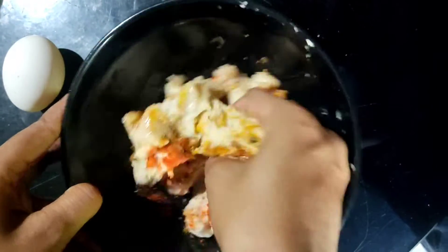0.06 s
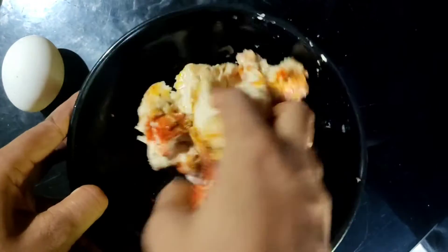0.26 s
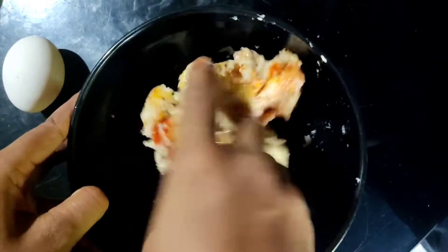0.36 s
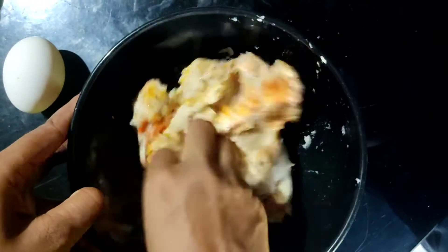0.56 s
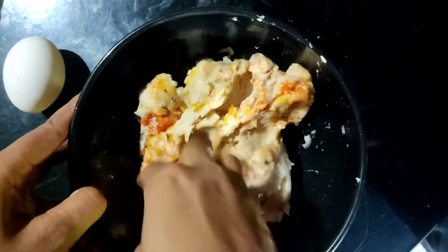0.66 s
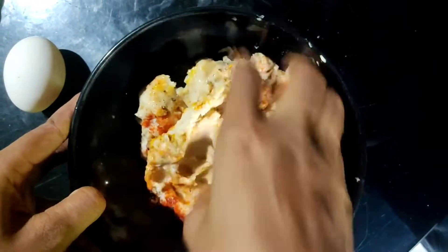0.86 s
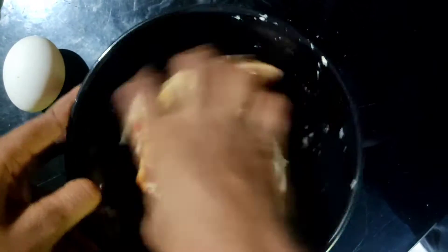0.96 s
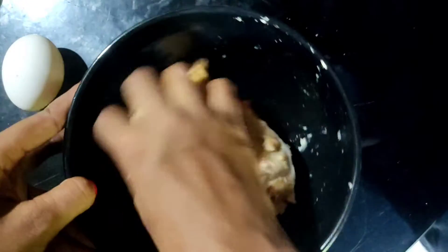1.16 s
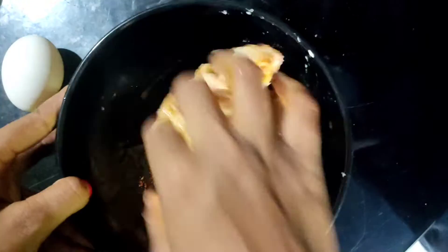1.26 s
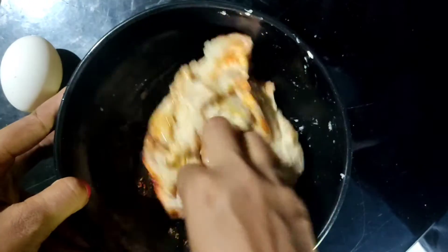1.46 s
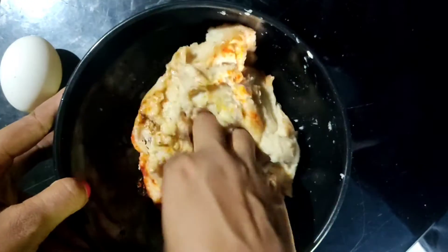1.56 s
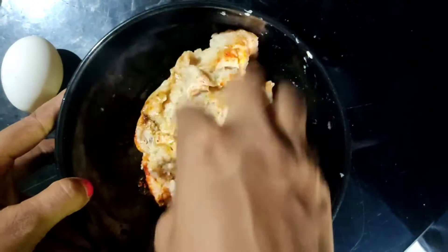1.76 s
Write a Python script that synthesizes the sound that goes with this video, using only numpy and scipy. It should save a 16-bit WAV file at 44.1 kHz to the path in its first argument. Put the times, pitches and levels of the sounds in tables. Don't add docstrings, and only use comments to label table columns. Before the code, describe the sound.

Sticky wet paste crackles under a kneading hand, heard very close in a small kitchen. Fine snaps and a slight finger squeak open it; at 0.23 and 0.3 seconds the bowl knocks hard on the counter, hollow and briefly ringing. Softer crackles follow around 0.6 to 0.8, then near quiet. A light bowl touch at 1.05 leads into smearing, densest snapping near 1.3, and gentler crackles from 1.5 over faint low hum.

```python
import sys
import numpy as np
from scipy import signal
from scipy.fft import rfft, irfft, next_fast_len
from scipy.io import wavfile

SR = 44100
rng = np.random.default_rng(int(sys.argv[2]) if len(sys.argv) > 2 else 0)


def pcm_store(signal):
    levels = np.round(np.clip(np.atleast_2d(signal), -1, 1) * 32767)
    wavfile.write(sys.argv[1], SR, levels.astype(np.int16).T)


def gain_from_decibels(decibels):
    exponent = np.asarray(decibels, float) / 20
    return 10 ** exponent


N = 79380
T = np.arange(N) / SR
LEFT_LAG_S = .00048


def paste(sticky_db):
    out = crackle(sticky_db)
    add_snaps(out)
    return out


def crackle(sticky_db):
    snaps_per_s, spread_db, clump_db = 1400, 4, 3.5
    grain_hz, grain_s, click_share = 7900, .0006, .35
    crackle_db, hiss_db = -2, -5.5
    sizes = gain_from_decibels(spread_db * np.minimum(rng.exponential(1, N), 4)) * rng.choice([-1, 1], N)
    clicks = sizes * (rng.random(N) < snaps_per_s * gain_from_decibels(clump_db * drift(40)) / SR)
    t = T[:int(grain_s * SR)]
    grain = np.hanning(len(t)) * np.cos(2 * np.pi * grain_hz * t) / 4
    fine = click_share * clicks + np.convolve(clicks, grain, "same")
    fine = ports(fine, fine)
    hiss = ports(*rng.standard_normal((2, N)))
    mix = gain_from_decibels(crackle_db) * fine / fine[1].std() + gain_from_decibels(hiss_db) * hiss / hiss[1].std()
    return gain_from_decibels(sticky_db + 4.0) * mix


# middle_s, level_db (peak), brightness (0-1.5)
SNAPS = [(.007, -40, .9), (.0165, -41, .9), (.043, -33, .9), (.063, -41, .9), (.070, -41, .9),
         (.0935, -37, .8), (.1025, -42, .3), (.135, -40, .9), (.1365, -38, .9), (.1555, -38, .9),
         (.1665, -33.5, .9), (.168, -36, .9), (.181, -39, .9), (.1885, -38, .5), (.1905, -39, .9),
         (.199, -39, .9), (.2115, -38, .8), (.4205, -35, .7), (.615, -42, .7), (.722, -40, .9),
         (.7332, -35, .9), (.736, -31, .9), (.740, -32, .9), (.753, -33, .9), (.7707, -36, .9),
         (.888, -58, .8), (.946, -51, .6), (1.130, -43, .4), (1.146, -42, .9), (1.237, -43, .9),
         (1.247, -34, .9), (1.249, -41, .2), (1.2553, -35, .9), (1.260, -34, .9), (1.265, -36, 1.1),
         (1.2745, -39, .5), (1.276, -38, .9), (1.2853, -24, .2), (1.2925, -36, 1.5), (1.2985, -36, .9),
         (1.300, -33, .9), (1.304, -35, .9), (1.3135, -35, .9), (1.3793, -41, .7), (1.500, -47, .1),
         (1.504, -38, .3), (1.5095, -45, .7), (1.5625, -42, .9), (1.565, -36.5, .6), (1.573, -43, .3),
         (1.584, -43, .7), (1.620, -38, .8), (1.635, -46, .8), (1.6886, -45, .8), (1.7025, -43, .8),
         (1.728, -37, .95), (1.7305, -38, .95), (1.739, -38, .4), (1.7665, -38, .9), (1.7905, -39, .6)]


def add_snaps(out):
    low_hz, rise_hz, ring_s = 3600, 4800, .0013
    left_db, gain_db = -3, 3.5
    click = 1. * (T == 0)
    heard = ports(gain_from_decibels(left_db) * click, click)[:, :256]
    heard = high_pass(heard, 2, 2800)
    for s, db, bright in SNAPS:
        length_s = ring_s * min(bright, 2 - bright * 1.1) ** 2
        t = T[:5 + int(length_s * SR)]
        burst = np.hanning(len(t)) * np.cos(2 * np.pi * (low_hz + rise_hz * bright ** 0.85) * t)
        snap = signal.fftconvolve(heard, [burst], axes=1)[:, :256]
        start = int((s - t[-1] / 2) * SR)
        out[:, start:][:, :256] += gain_from_decibels(db + gain_db) * snap / np.abs(snap[1]).max()


def after_snaps(level_db, gain_db, dull):
    fade_s = 0.0089
    run = 0
    for s, db, bright in SNAPS:
        size = gain_from_decibels(db + gain_db) * (1 - dull * np.clip(bright, 0, 1))
        run = run + size * (T > s) * np.exp(-np.maximum(T - s, 0) / fade_s)
    return 20 * np.log10(gain_from_decibels(level_db) + run)


# freq_hz, level_db
PASTE_LEFT = [(400, -8.5), (1500, -15.5), (3500, -23), (6000, -13), (7500, -17.5), (9200, 0.5),
              (10500, -14), (15000, -16.5)]
# freq_hz, level_db
PASTE_RIGHT = [(400, -29), (1500, -18.5), (3500, -8.5), (6000, -4), (7800, 4.5), (9200, -6), (10500, -10.5),
               (15000, -23.5)]


def ports(left, right):
    return np.array([colour(left, PASTE_LEFT, LEFT_LAG_S), colour(right, PASTE_RIGHT, 0)])


# start_s (of the crack), body_db, crack_db, run_up_s, body_delay_s
KNOCKS = [
    (0.2276, -10.5, -6.5, 0.0059, 0.0009),
    (0.2994, -11, -0.5, 0.00034, 0.0029),
    (1.052, -29.5, -36.5, 0.0057, 0.001),
    (1.0564, -19.5, -37.5, 0.0029, 0.001202),
]
# freq_hz, level_db, t60_s
HOLLOW = [(915, 12.5, .075), (900, 11, .05), (800, 6, .03), (930, 12, .05)]
# freq_hz, level_db, t60_s
COUNTER = [(200, -3.5, 0.066), (420, -7.5, 0.037), (210, -6, .06), (250, 9, .09)]


def knocks():
    wobble_db = 3.5 * drift(18)
    blows, crack, rung = np.zeros(N), np.zeros((2, N)), np.zeros((2, N))
    for (s, body_db, crack_db, run_s, later_s), hollow, counter in zip(KNOCKS, HOLLOW, COUNTER):
        crack += gain_from_decibels(crack_db) * friction_crack(s, run_s)
        struck = blow(s + later_s, body_db, crack_db)
        blows += struck
        rung += bowl_ring(struck, [hollow, counter], wobble_db)
    gritty = grit(crack)
    sent = crack_to_walls(crack)
    crack = ports(gain_from_decibels(-10) * crack[0], crack[1])
    body = high_pass(hollow_thud(blows), 3, 165) + low_pass(gritty, 6, 9600)
    return body, high_pass(rung, 3, 165), low_pass(crack, 6, 9600), sent


def friction_crack(s, run_s):
    own_share, fade_s = .9, .001
    own, shared = rng.standard_normal((2, N))
    run_up = np.clip(1 + (T - s) / run_s, 0, 1)
    fade = np.exp(-np.maximum(T - s, 0) / fade_s)
    return np.array([own_share * own + shared, shared]) * np.where(T < s, run_up, fade)


def blow(start_s, body_db, crack_db):
    contact_s, swell_db, hard_hz, softens = .00055, 4.5, 6020, 0.77
    force = np.zeros(N)
    for k in range(4):
        at = int((start_s + contact_s * (k - 3)) * SR)
        force[at] = gain_from_decibels(body_db - swell_db * (3 - k)) * (-1) ** k
    top_hz = min(hard_hz * gain_from_decibels(softens * (crack_db - body_db)), SR / 3)
    return low_pass(force, 2, top_hz)


# freq_hz, level_db, t60_s
BOWL = [(194, -10, 0.54), (260, -8.5, .25), (270.8, -4, 0.36), (371.3, -11.5, 0.12), (446.7, -10.5, .17),
        (587, -3, 0.06), (772, -19, 0.12), (852, -6.5, 0.18), (1002, -13, .18), (1042, -8.5, 0.14),
        (1140, -7, 0.081), (1306, -12.5, 0.04), (2215, -14, 0.05), (3626, 3, 0.04)]


def bowl_ring(force, own_modes, wobble_db):
    rung = np.zeros((2, N))
    for hz, db, t60 in [*BOWL, *own_modes]:
        chance_db = rng.normal(0, 2.5, (2, 1))
        waver_db = np.roll(wobble_db, int(7 * hz)) * (t60 > .1)
        rung += gain_from_decibels(-20 + db + chance_db + waver_db) * ring(force, hz, t60)
    return rung


# freq_hz, level_db
THUD = [(60, -52.5), (230, 4), (500, 0.5), (900, -4.5), (1300, 4), (2200, -15), (3500, -30.5), (6000, -62)]


def hollow_thud(blows):
    return gain_from_decibels(27) * np.array([colour(blows, THUD, .00043), colour(blows, THUD, 0)])


def grit(crack):
    band = signal.butter(2, [1600, 5500], "band", fs=SR, output="sos")
    out = gain_from_decibels(-8) * signal.sosfilt(band, crack)
    out[0] = gain_from_decibels(-9.5) * np.roll(out[0], int(LEFT_LAG_S * SR))
    return out


# freq_hz, level_db
CRACK_SENT = [(1500, -24), (3500, -14), (6000, -7), (7800, -8), (9300, -6), (10500, -25)]


def crack_to_walls(crack):
    return np.array([colour(c, CRACK_SENT, 0) for c in crack])


# middle_s, length_s, level_db, pitch_hz
RUBS = [
    (0.108, 0.12, -60.5, 2300),
    (0.06, 0.034, -68, 1100),
    (1.2, 0.053, -81, 2700),
    (1.79, 0.034, -65, 1500),
]


def rubs():
    out = np.zeros((2, N))
    for s, length, db, hz in RUBS:
        grain = rng.standard_normal((2, N)) * gain_from_decibels(2.8 * drift(130.0))
        band = signal.butter(2, [hz / 1.27, hz * 1.25], "band", fs=SR, output="sos")
        swell = np.clip(1 - (2 * (T - s) / length) ** 2, 0, 1)
        out += gain_from_decibels(db) * rms_one(signal.sosfilt(band, grain)) * swell
    return out


# freq_hz, level_db (per Hz)
SMEAR = [(240, -55.5), (400, -24), (834, -6), (2440, -16.5), (3960, -17), (5500, -13), (7150, -63.5),
         (12100, -120)]
# freq_hz, level_db (per Hz)
PUSH = [(65, -17), (110, -13.5), (172, -9), (411, -14), (486, -17.5), (900, -21.5), (1170, -16),
        (1980, -120)]


def hand(smear_db, push_db):
    push = gain_from_decibels(push_db) * banded_noise(PUSH, patchy_db=-0.5, rate=30.)
    return push + gain_from_decibels(smear_db) * banded_noise(SMEAR, patchy_db=3, rate=70)


# freq_hz, t60_s
ROOM_T60 = [(100, 0.57), (250, 0.31), (900, 0.36), (2500, 0.29), (8000, 0.26)]


def kitchen(x):
    first_echo_s = 0.0017
    far_wall_s, far_wall_width_s, far_wall_db = .034, .004, 5.
    t = T[:SR // 2 + SR // 4]
    white = rng.standard_normal((2, len(t)))
    tail = 0
    for hz, sos in bands():
        mid, side = signal.sosfilt(sos, white) * gain_from_decibels(-60 * t / at_hz(ROOM_T60, hz))
        tail = tail + spread(mid, side, hz)
    onset = np.clip(t / first_echo_s - .5, 0, 1)
    far_wall = gain_from_decibels(far_wall_db * np.exp(-((t - far_wall_s) / far_wall_width_s) ** 2))
    tail = tail * onset * far_wall
    return signal.fftconvolve(x, tail / np.sqrt(np.sum(tail ** 2) / 2), axes=1)[:, :N]


TILTS_S = [0, .297, 1.0, 2]


def room(walls):
    return sum(kitchen(walls * (T >= a) * (T < b)) for a, b in zip(TILTS_S, TILTS_S[1:]))


# freq_hz, level_db (per Hz)
HUM = [(13, -24), (22, 8), (101, -17), (257, -17), (408, -28.5), (632, -26.5), (1430, -64), (11100, -66.5),
       (15000, -72)]


def hum():
    return gain_from_decibels(-62.5 - 1.5) * banded_noise(HUM, patchy_db=-1.7, rate=4.3)


def banded_noise(spectrum, patchy_db, rate):
    out, white, flicker = 0, rng.standard_normal((2, 2, N)), drift(rate)
    for k, (hz, sos) in enumerate(bands()):
        if spectrum[0][0] < hz < spectrum[-1][0]:
            mid, side = signal.sosfilt(sos, white[k % 2])
            out = out + gain_from_decibels(at_hz(spectrum, hz) + patchy_db * flicker) * spread(mid, side, hz)
    return rms_one(out)


# freq_hz, correlation (0-1)
LIKENESS = [(30, 0.19), (150, 0.54), (400, 0.66), (1000, .3), (4000, 0.15), (12000, 0.1)]


def spread(mid, side, hz):
    alike = np.clip(at_hz(LIKENESS, hz), -1, 1)
    return np.sqrt(1 + alike) * mid + np.sqrt(1 - alike) * side * [[1], [-1]]


def bands():
    edges_hz = 22 * 2 ** np.arange(0, 9.7, 1 / 3)
    return [(np.sqrt(a * b), signal.butter(2, [a, b], "band", fs=SR, output="sos"))
            for a, b in zip(edges_hz, edges_hz[1:])]


def colour(x, spectrum, lag_s):
    size = next_fast_len(N + SR)
    hz = np.arange(size // 2 + 1) * SR / size
    cep = irfft(at_hz(spectrum, hz + 1) * np.log(10) / 20, size)
    cep[1:size // 2] *= 2
    cep[size // 2 + 1:] = 0
    response = np.exp(rfft(cep) - 2j * np.pi * hz * lag_s)
    return irfft(rfft(x, size) * response, size)[:N]


def ring(clicks, hz, t60):
    r, w = gain_from_decibels(-60 / (t60 * SR)), 2 * np.pi * hz / SR
    return signal.lfilter([0, np.sin(w)], [1, -2 * r * np.cos(w), r * r], clicks + 1e-18)


def drift(rate):
    r = np.exp(-2 * np.pi * rate / SR)
    return rms_one(signal.lfilter([1], [1, -2 * r, r * r], rng.standard_normal(N + SR))[SR:])


def low_pass(x, order, hz):
    return signal.sosfilt(signal.butter(order, hz, fs=SR, output="sos"), x)


def high_pass(x, order, hz):
    return signal.sosfilt(signal.butter(order, hz, "high", fs=SR, output="sos"), x)


def at_hz(points, hz):
    table = np.array(points)
    return np.interp(np.log(hz), np.log(table[:, 0]), table[:, 1])


def rms_one(x):
    return x / np.sqrt(np.mean(x ** 2) + 1e-20)


# start_s, stickiness_db, smear_db, push_db
KNEAD = [(0, -55.5, -65.5, -59.5), (0.197, -54, -66.5, -85), (0.448, -65.5, -70.5, -55),
         (0.588, -69, -72.5, -77.5), (0.613, -55, -66, -63.5), (0.708, -64, -79, -66),
         (0.733, -55, -86, -70.5), (0.783, -59, -89, -60), (0.807, -73.5, -81, -70),
         (0.928, -90.5, -83.5, -78), (0.954, -65.5, -78, -66.5), (1.077, -56, -56, -59.5),
         (1.226, -60.5, -64.5, -69), (1.304, -47.5, -61, -70), (1.4, -68, -77, -69.5),
         (1.48, -70.5, -74, -72), (1.578, -59, -68.5, -66), (1.8, -58.5, -89, -68)]


def scene():
    s, *controls = np.transpose(KNEAD)
    sticky, smear, push = [np.interp(T, s, c) for c in controls]
    sticky = after_snaps(sticky, -24.5, dull=0.19)
    smear = after_snaps(smear, -31, dull=1)
    wet = paste(sticky)
    thud, rung, crack, sent = knocks()
    walls = gain_from_decibels(-0.5) * (thud + gain_from_decibels(-5.0) * rung) + gain_from_decibels(-13.5) * sent + gain_from_decibels(-20.5) * wet
    return wet + thud + rung + crack + rubs() + hand(smear, push) + room(walls) + hum()


def band_limit(x):
    return signal.sosfilt(signal.butter(12, 15770, fs=SR, output="sos"), x)


def record(dry):
    return band_limit(1.784 * np.tanh(dry / 1.247))


dry = scene()
out = record(dry)
pcm_store(out)
```